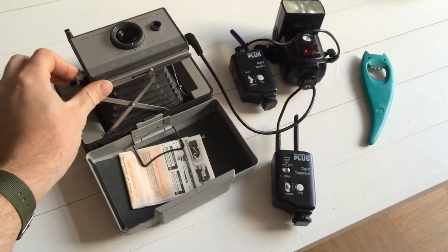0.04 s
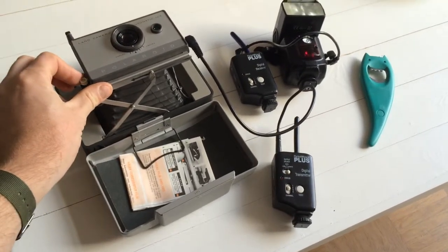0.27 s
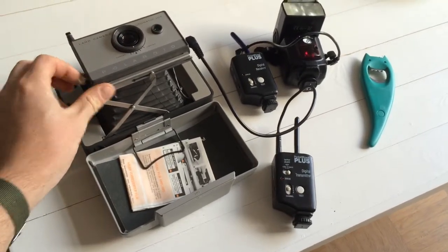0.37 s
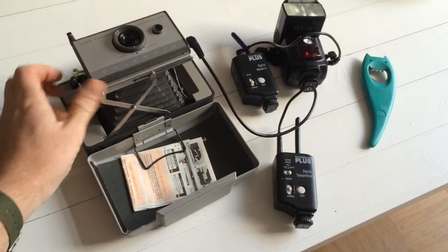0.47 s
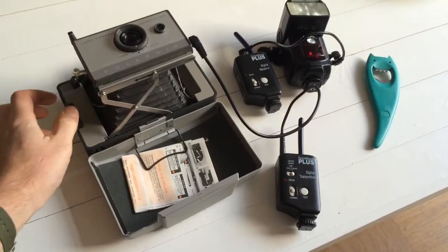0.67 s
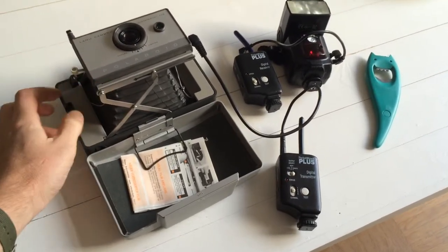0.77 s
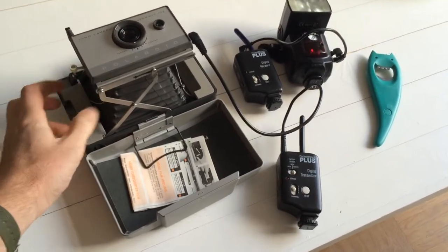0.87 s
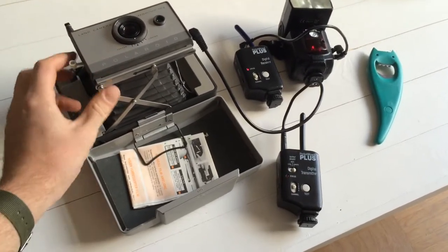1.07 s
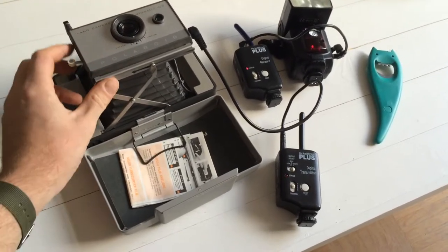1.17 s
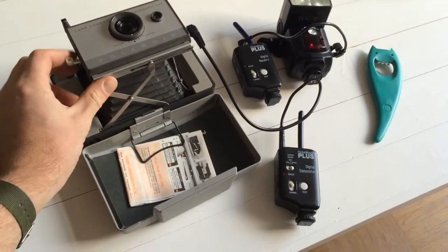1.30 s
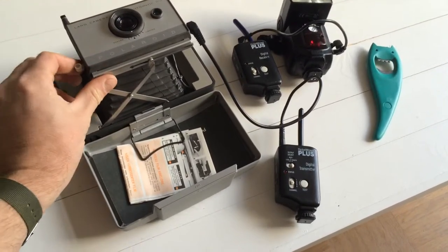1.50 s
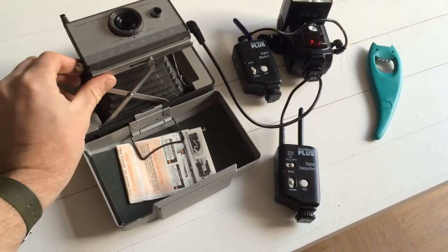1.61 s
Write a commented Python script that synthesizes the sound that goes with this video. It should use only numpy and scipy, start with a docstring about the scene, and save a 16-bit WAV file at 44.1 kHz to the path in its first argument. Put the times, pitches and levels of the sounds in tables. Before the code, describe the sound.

A folding camera's side door clicks and clacks: the catch clicks, the door drops open with a hollow knock and metallic snap, then fingers press it shut with a light tick. Close microphone, quiet room, faint low hum.

```python
"""A folding camera on a table in a quiet room, handled close to one microphone over a low, wavering hum.
Loose parts tick under the fingers, then a catch clicks. The side door lets go with a soft bump and drops
open: the hollow body clacks, the table booms, and the door's metal fitting snaps just after.
Fingers slide back over the case and press the door home with a tick and a tiny squeak.
Each contact is a crack of noise plus the ringing modes of the part, with a short room tail behind it."""
import sys
import numpy as np
from scipy import signal
from scipy.fft import rfft, irfft, next_fast_len
from scipy.io import wavfile
from scipy.ndimage import map_coordinates

SR = 44100
rng = np.random.default_rng(int(sys.argv[2]) if len(sys.argv) > 2 else 0)


def int16_out(signal):
    """Quantize to a 16-bit WAV file."""
    q = np.round(np.clip(np.atleast_2d(signal).T, -1, 1) * 32767)
    wavfile.write(sys.argv[1], SR, q.astype(np.int16))


N = 72765
T = np.arange(N) / SR
BLOW_T = np.arange(16384) / SR  # time since a contact, s
TOP_HZ = 15450

# swells and dips of the hum: t/s, relative level/dB
HUM_SWELLS = [(0.0, -60), (0.064, -50), (0.196, -56.5), (0.27, -46), (0.32, -61.5), (0.436, -49.5),
              (0.638, -56), (0.726, -46.5), (0.78, -65), (0.818, -63.5), (0.876, -46), (0.936, -61.5),
              (0.96, -52), (1.116, -55.5), (1.158, -47), (1.194, -54), (1.616, -52.5), (1.65, -62)]
# spectra of the room's rumble and air: f/Hz, relative density/dB
RUMBLE_COLOUR = [(20, -20), (35, -10.5), (50, 4.5), (62, -7), (100, 1), (135, -10), (200, -43.5),
                 (400, -80)]
AIR_COLOUR = [(76, -36), (130, 0), (284, -2), (487, -10), (549, -8.5), (631, -11.5), (1250, -14),
              (1380, -15.5), (3260, -22.5), (15500, -33.5)]
# loose parts nudged by the fingers: t/s, level/dB, t60/s
LOOSE_TICKS = [(0.0498, -54, 0.015), (0.1692, -56.5, 0.012), (0.207, -55, 0.0083), (0.461, -51.5, 0.022),
               (0.4677, -49.5, .02), (1.4123, -54, 0.013), (1.436, -56.5, 0.019), (1.514, -54.5, .01),
               (1.52, -56, 0.017), (1.562, -61, 0.013)]
# contacts of each part: t/s, gain on its modes/dB, crack level/dB, crack t60/s
CATCH_HITS = [(.2409, -28, -33, .008), (.2427, -1.5, -32, 0.012), (.2448, -19, -35, 0.012)]
BODY_HITS = [(.4812, 0, -26, 0.021), (.4832, -28, -28.5, 0.017)]
FITTING_HITS = [(.5376, 0, -24.5, 0.015)]
SEAT_HITS = [(1.5782, 0.012, -39.5, 0.011)]
# modes of the catch, hollow body, table top, door with fitting and seated door: f/Hz, level/dB, t60/s
CATCH_MODES = [(612, -40.5, 0.015), (894, -35.5, 0.025), (1230, -35, 0.024), (1473, -39.5, 0.023),
               (2070, -33.5, 0.025), (2840, -41, 0.017), (3640, -35.5, .014), (7220, -34.5, 0.0083)]
BODY_MODES = [(186, -25.5, 0.059), (230.3, -48.5, 0.38), (297.2, -39, .17), (538, -44, 0.11),
              (773.5, -31, 0.048), (862, -43.5, 0.15), (970, -30.5, 0.044), (1236, -38.5, 0.065),
              (1472, -34.5, 0.063), (1742, -31.5, 0.047), (1933, -30, 0.039), (2200, -33.5, .035),
              (3090, -36, 0.018)]
TABLE_MODES = [(53.6, -31, 0.15), (111.7, -39, 0.21)]
FITTING_MODES = [(109, -35.5, 0.11), (745, -42.5, 0.022), (1053, -38.5, 0.045), (2330, -45, 0.022),
                 (2700, -38, 0.014), (3670, -58, 0.0065), (4100, -39, 0.03), (5730, -32.5, 0.014),
                 (6736, -35, 0.013)]
SEAT_MODES = [(1020, -52, 0.034), (1940, -46, 0.018), (3370, -57, 0.011), (4350, -51, 0.0082)]
# spectrum of each part's contact crack: f/Hz, relative density/dB
CATCH_CRACK = [(250, -19), (700, -0.5), (2000, -3.5), (4500, 1), (7400, -5), (9000, -12), (12500, -9),
               (14800, -7.5)]
BODY_CRACK = [(120, -5), (450, -9), (800, 2), (2100, -2.5), (3300, -6.5), (5500, -12.5), (9000, -17),
              (15000, -22.5)]
FITTING_CRACK = [(300, -1.5), (1500, 1.5), (3000, 1), (7200, -0.5), (8200, -5), (11000, -16), (12800, -11),
                 (15000, -10)]
SEAT_CRACK = [(300, -2), (1500, 2.5), (2500, -2.5), (5000, -5.5), (8000, -6.5), (11000, -10), (15000, -18)]
# spectra of the ticks, door bump, strut rattle and rubbing skin: f/Hz, relative density/dB
TICK_COLOUR = [(300, -10), (1000, 2.5), (3500, -3.5), (7000, -10.5), (15000, -23)]
BUMP_COLOUR = [(300, -11), (700, -6), (1000, 0), (1500, -12), (4000, -33), (15000, -26)]
RATTLE_COLOUR = [(60, 2), (200, -3), (320, 5), (440, 0), (800, -3.5), (2100, -2), (3200, -3), (7000, -14),
                 (15000, -24.5)]
RUB_COLOUR = [(300, -4), (1500, 3.5), (3500, 4), (6000, -8), (8500, -3), (14500, -7)]
# strokes of the fingers on the case: t/s, level/dB
RUB_STROKES = [(1.18, -110), (1.25, -74), (1.33, -92), (1.36, -74.5), (1.44, -69), (1.5, -89),
               (1.57, -72.5), (1.63, -78.5)]
# decay of the room: f/Hz, t60/s
ROOM_T60 = [(100, 0.82), (400, 0.58), (2000, 0.57), (7000, 0.48), (10000, 0.59), (15000, 0.24)]
# spectrum of the room's reflections: f/Hz, relative density/dB
ROOM_COLOUR = [(100, -1.5), (400, -1.5), (1000, -0.5), (6000, -3.5), (10000, -7.5), (15000, -1)]


def amp(db):
    """Decibels to gain."""
    return 10 ** (np.asarray(db) / 20)


def unit(x):
    """Scale to rms 1."""
    return x / np.sqrt(np.mean(x ** 2) + 1e-20)


def at(start_s, x):
    """Place a short sound in the scene."""
    return np.pad(x, (round(start_s * SR), N))[:N]


def along(points, hz):
    """Read (f/Hz, value) points along a log frequency axis."""
    freqs, values = np.transpose(points)
    return np.interp(np.log(hz + 1), np.log(freqs + 1), values)


def noise(colour, size=N):
    """Coloured noise of rms 1."""
    padded = next_fast_len(size, real=True)
    gain = amp(along(colour, np.fft.rfftfreq(padded, 1 / SR)))
    spectrum = rfft(rng.standard_normal(padded)) * gain
    return unit(irfft(spectrum, padded)[:size])


def wobble(knots_per_s):
    """A smooth random curve."""
    return map_coordinates(rng.standard_normal(N), [T * knots_per_s], order=3)


def fade(t60, rise_s):
    """Envelope of a blow: a rise, then a steady decay."""
    return (1 - np.exp(-BLOW_T / rise_s)) * np.exp(-np.log(1000) * BLOW_T / t60)


def burst(t60, colour, rise_s=0.00063):
    """A dying burst of noise whose energy is set by its envelope."""
    envelope = fade(t60, rise_s)
    return unit(envelope * noise(colour, size=len(envelope))) * np.sqrt(np.mean(envelope ** 2))


def ringing(modes, rise_s):
    """One dying sine for each mode."""
    return [amp(db) * fade(t60, rise_s) * np.sin(2 * np.pi * hz * BLOW_T) for hz, db, t60 in modes]


def struck(hits, modes, colour, directions, scatter_db=1):
    """Each contact cracks and rings the part's modes, a little differently in each direction."""
    polarity = (-1) ** np.arange(len(modes))
    rings = polarity[:, None] * ringing(modes, rise_s=0.00013)
    radiated = np.zeros((directions, N))
    for start_s, ring_db, crack_db, crack_t60 in hits:
        for direction in range(directions):
            ring = amp(ring_db + scatter_db * rng.standard_normal(len(modes))) @ rings
            crack = amp(crack_db) * burst(crack_t60, colour)
            radiated[direction] += at(start_s, ring + crack)
    return radiated


def room_tone(hum_hz=83.13, waver_rad=0.23, trim_db=-1):
    """The bed of the place: a low hum that swells and dips, over rumble and faint air."""
    hum = unit(np.sin(2 * np.pi * hum_hz * T + waver_rad * wobble(knots_per_s=18.36)))
    swell = amp(trim_db + np.interp(T, *np.transpose(HUM_SWELLS)))
    return swell * hum + amp(-61) * noise(RUMBLE_COLOUR) + amp(-66.5) * noise(AIR_COLOUR)


def loose_ticks():
    """Loose parts tick faintly as the fingers nudge them."""
    return sum(at(start_s, amp(db) * burst(t60, TICK_COLOUR)) for start_s, db, t60 in LOOSE_TICKS)


def catch_click(directions):
    """Three contacts of the catch within 4 ms reach the microphone as one click."""
    return struck(CATCH_HITS, CATCH_MODES, CATCH_CRACK, directions)


def door_bump(start_s=0.4):
    """The door lets go with a soft bump."""
    return at(start_s, amp(-61) * burst(t60=0.017, colour=BUMP_COLOUR))


def door_clack(directions):
    """The door drops open, ringing the hollow body and shaking the struts and case."""
    rattle = amp(-40) * burst(t60=0.18, colour=RATTLE_COLOUR, rise_s=0.0034)
    return struck(BODY_HITS, BODY_MODES, BODY_CRACK, directions) + at(BODY_HITS[0][0], rattle)


def table_boom():
    """The table top takes up the clack; its low modes swell and die under it."""
    return at(BODY_HITS[0][0], sum(ringing(TABLE_MODES, rise_s=0.05)))


def fitting_snap(directions):
    """The metal fitting snaps once, ringing brightly together with the door."""
    return struck(FITTING_HITS, FITTING_MODES, FITTING_CRACK, directions)


def finger_rub(rough_db=2.5):
    """Skin slides unevenly over the case with a faint hiss."""
    level_db = np.interp(T, *np.transpose(RUB_STROKES)) + rough_db * wobble(knots_per_s=150)
    return amp(level_db) * noise(RUB_COLOUR)


def door_tick(directions):
    """Pressed home, the door meets its seat and rings briefly."""
    return struck(SEAT_HITS, SEAT_MODES, SEAT_CRACK, directions)


def door_squeak(start_hz=930, settled_hz=1176, glide_s=0.0043, hold_s=0.025, release_s=0.0024):
    """The door slips into its seat with a squeak that rises, settles and stops as it comes to rest."""
    hz = settled_hz + (start_hz - settled_hz) * np.exp(-BLOW_T / glide_s)
    tone = np.sin(2 * np.pi * np.cumsum(hz) / SR)
    stop = np.exp(-np.maximum(BLOW_T - hold_s, 0) / release_s)
    return at(SEAT_HITS[0][0], amp(-47) * fade(t60=0.16, rise_s=0.002) * stop * tone)


def room_reflections(x, early_db=-10, early_delay_s=0.0094, tail_db=-9.5, tail_delay_s=0.0038):
    """Early reflections off the table and nearby things, and a tail that dies faster in the treble."""
    hz, t, spectra = signal.stft(noise(ROOM_COLOUR, size=len(BLOW_T)), SR, nperseg=256)
    decay = np.exp(-np.log(1000) * t / along(ROOM_T60, hz)[:, None])
    tail = signal.istft(spectra * decay, SR, nperseg=256)[1]
    tail *= np.clip(BLOW_T / tail_delay_s - 1, 0, 1)  # silent for the delay, then fades in
    early = at(early_delay_s, burst(t60=0.13, colour=ROOM_COLOUR, rise_s=0.0012))[:len(tail)]
    response = amp(tail_db) * tail / np.linalg.norm(tail) + amp(early_db) * early / np.linalg.norm(early)
    return signal.fftconvolve(x, response)[:N]


def scene(directions=5):
    """The first direction leads straight to the microphone; the others reach it by way of the room."""
    handling = loose_ticks() + finger_rub()
    click = catch_click(directions)
    opening = door_bump() + door_clack(directions)
    snap = fitting_snap(directions)
    closing = door_tick(directions) + door_squeak()
    direct = (click + opening + snap + closing)[0] + handling + table_boom()
    into_room = (amp(-4) * click + opening + amp(-1) * snap + amp(-6.5) * closing)[1:] + handling
    reflected = sum(room_reflections(x) for x in into_room) / np.sqrt(directions - 1)
    return (room_tone() + direct + reflected)[None]


def record(dry):
    """One microphone channel, with a 35 Hz low cut and a steep cut at the recorder's band limit."""
    low_cut = signal.butter(2, 35, "highpass", fs=SR, output="sos")
    top_cut = signal.cheby1(12, .2, TOP_HZ - 200, fs=SR, output="sos")
    return signal.sosfilt(np.vstack([low_cut, top_cut]), dry)


dry = scene()
out = record(dry)
int16_out(out)
```